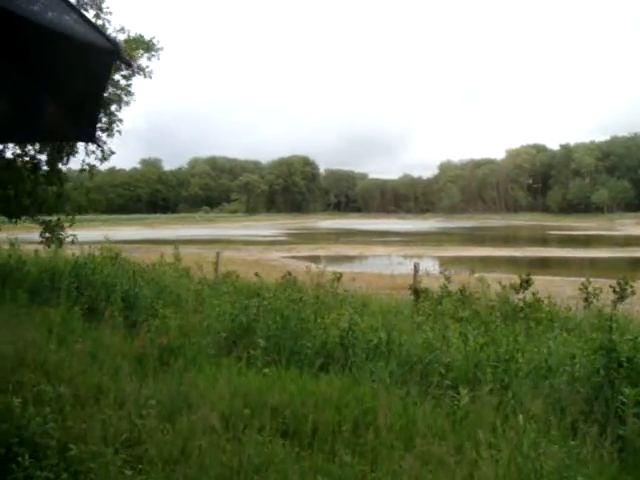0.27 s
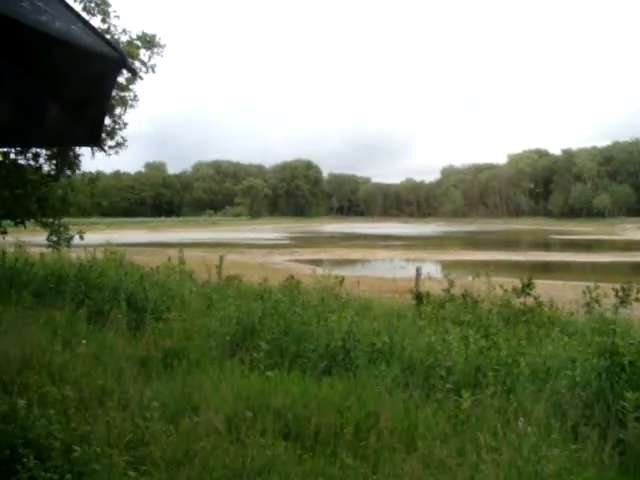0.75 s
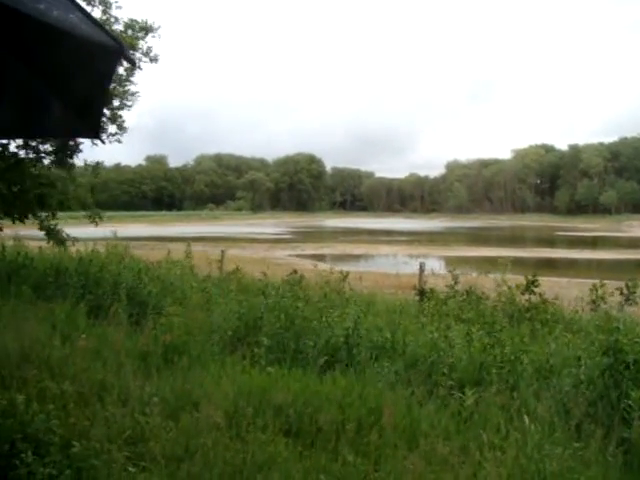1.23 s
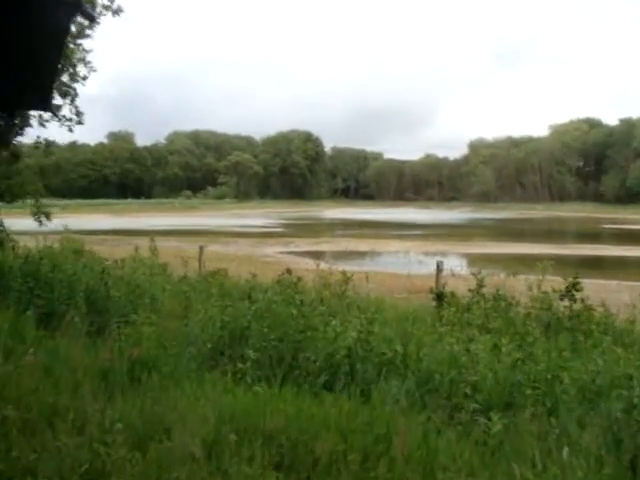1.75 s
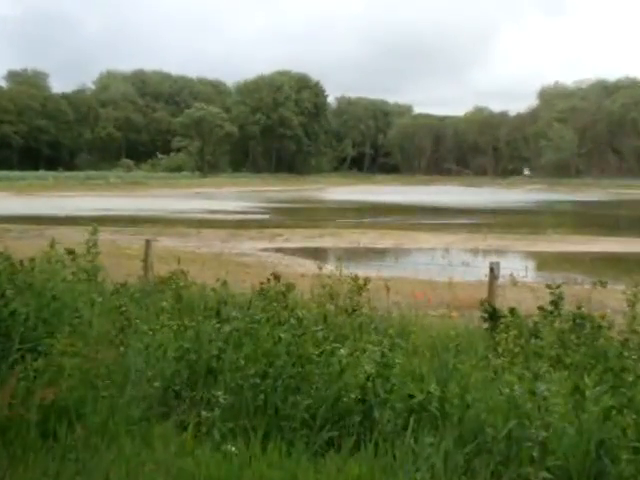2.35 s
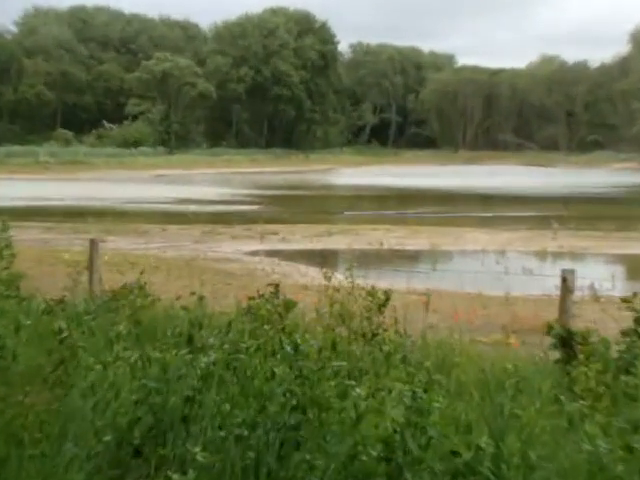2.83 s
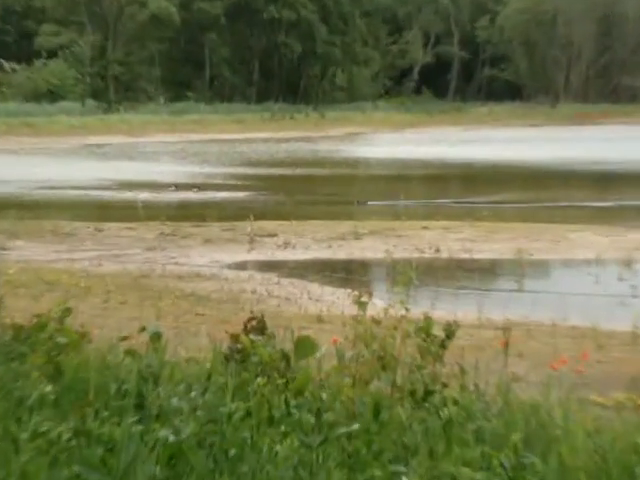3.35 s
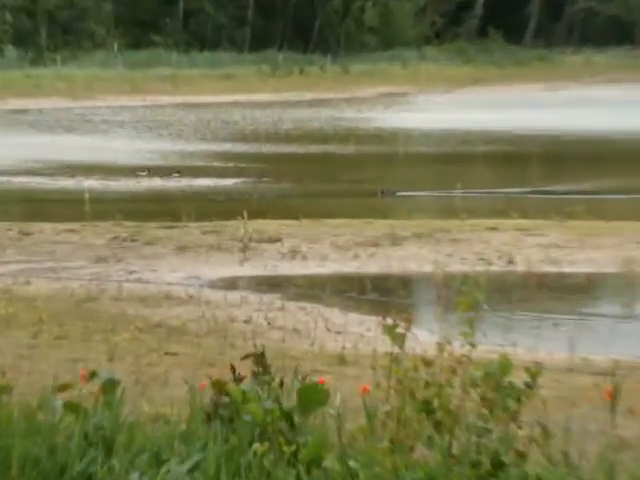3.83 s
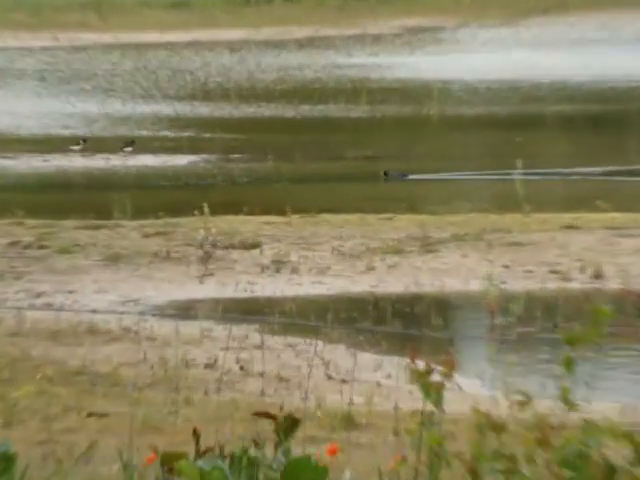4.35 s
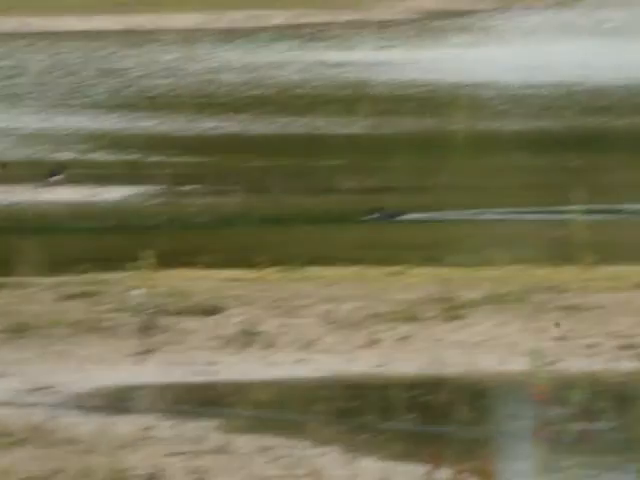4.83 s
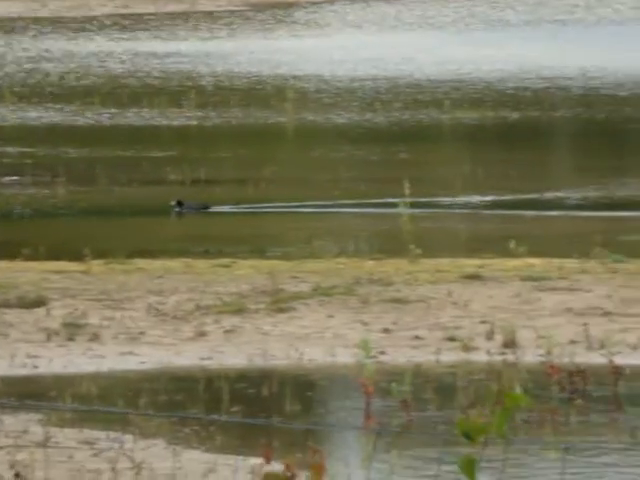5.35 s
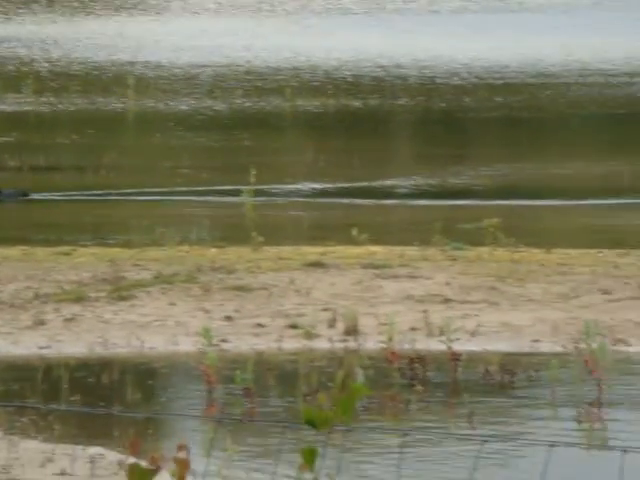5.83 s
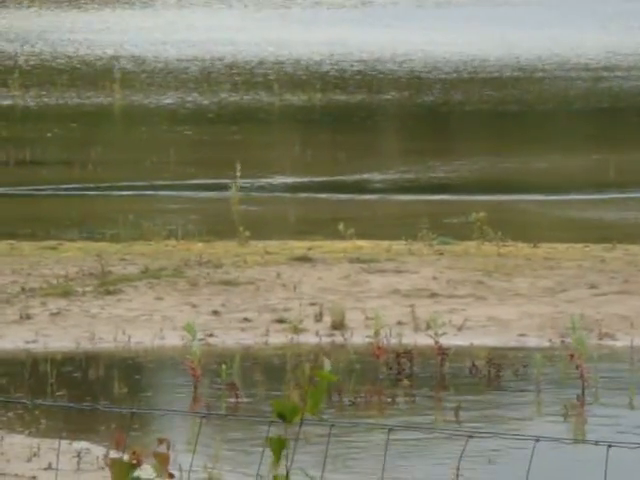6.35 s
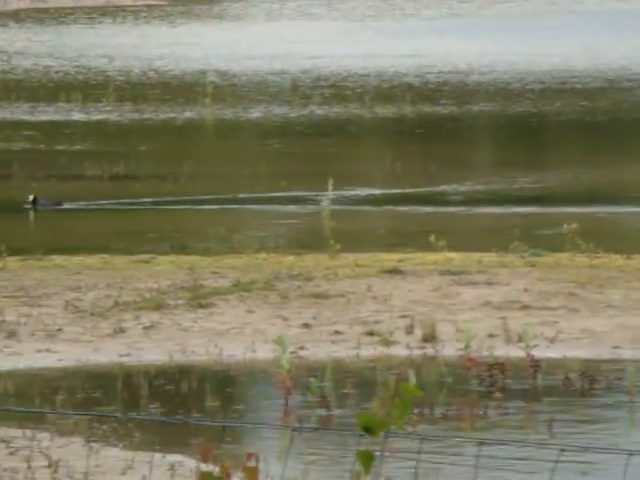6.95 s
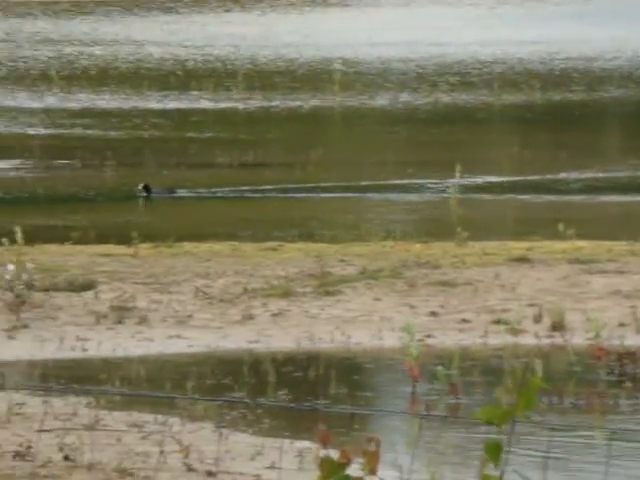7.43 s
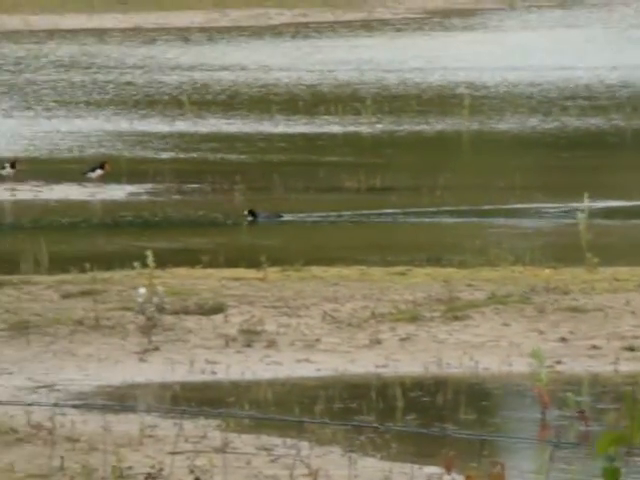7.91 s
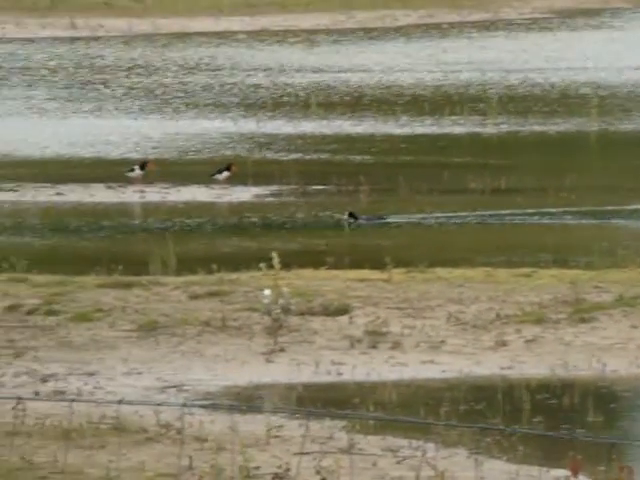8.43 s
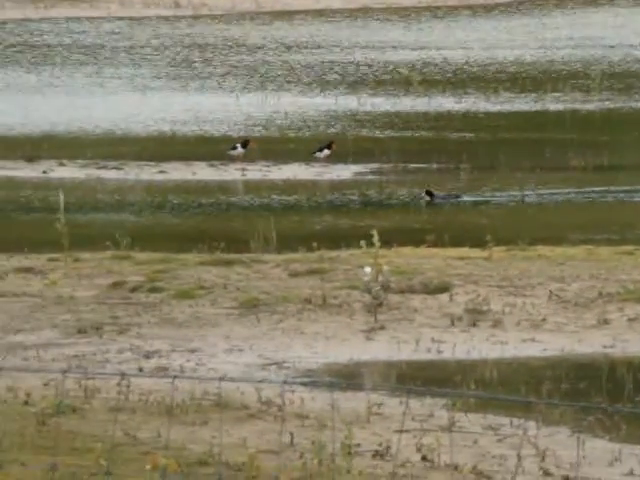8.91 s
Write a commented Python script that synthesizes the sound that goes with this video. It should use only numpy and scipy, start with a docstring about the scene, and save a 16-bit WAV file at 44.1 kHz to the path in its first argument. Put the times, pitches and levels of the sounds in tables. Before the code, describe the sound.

Several oystercatchers pipe across a marsh pool for the whole nine seconds, their short, shrill, rising and falling notes overlapping, with a light echo from reeds and trees. The piping is dense and loudest around 2 seconds. Longer, clean high whistles stand out at about 0.5, 2 and 2.6 seconds, and a softer one at 5.3. A quick fading trill runs underneath at 3 seconds. Until about 3.4 seconds, soft low thumps, a few dry ticks and faint handling rumble sound close to the microphone. From roughly 3.8 to 5.2 seconds the calls become quieter and longer, ending in falling tails, as a faint rustle swells. Distant water birds give faint hoarse yelps between 5 and 6.5 seconds. The short piping picks up again from about 5.4 seconds and continues, a little sparser, to the end. A quiet rush and hiss of air lies beneath everything.

```python
"""Short arched pips from several oystercatchers overlap across a marsh pool, with four long whistles.
Each note is a syrinx tone on a bending pitch; the reeds, the bank and the far tree line throw it back.
Midway the long pips end in falling tails, and hoarse yelps of other water birds carry from further off.
Air rushes and hisses over the marsh; soft thumps and ticks sound close to the hand-held microphone."""
import sys
import numpy as np
from scipy import signal
from scipy.fft import rfft, irfft, next_fast_len
from scipy.io import wavfile
from scipy.ndimage import map_coordinates

SR = 44100
rng = np.random.default_rng(int(sys.argv[2]) if len(sys.argv) > 2 else 0)


def int16_out(signal):
    """Quantize to a 16-bit WAV file."""
    q = np.round(np.clip(np.atleast_2d(signal).T, -1, 1) * 32767)
    wavfile.write(sys.argv[1], SR, q.astype(np.int16))


N = 404397


def amp(db):
    """Decibels to gain."""
    return 10 ** (np.asarray(db) / 20)


def unit(x):
    """Scaled to rms 1."""
    return x / np.sqrt(np.mean(x ** 2) + 1e-20)


def along(points, hz):
    """(frequency [Hz], value) points read on a log axis."""
    knots_hz, values = np.transpose(points)
    return np.interp(np.log(hz + 1), np.log(knots_hz + 1), values)


def level(rows):
    """Gain per sample from (time [s], level [dB]) rows."""
    return amp(np.interp(np.arange(N) / SR, *np.transpose(rows)))


def wobble(rate, size):
    """A smooth random curve, rate knots a second."""
    knots = rng.standard_normal(int(size * rate / SR) + 4)
    return map_coordinates(knots, [np.arange(size) * rate / SR])


def filtered(x, response):
    """x through a filter whose gain is response(hz)."""
    size = next_fast_len(len(x) + 4096)
    return irfft(rfft(x, size) * response(np.fft.rfftfreq(size, 1 / SR)), size)[:len(x)]


def coloured(x, colour):
    """x shaped by (frequency [Hz], gain [dB]) points."""
    return filtered(x, lambda hz: amp(along(colour, hz)))


def noise(colour):
    """Noise of rms 1 with the given colour."""
    return unit(coloured(rng.standard_normal(N), colour))


def add(track, start, sound):
    """Mix a sound into the track, start seconds in."""
    part = track[max(round(start * SR), 0):][:len(sound)]
    part += sound[:len(part)]


# Rush from the distant trees: (frequency [Hz], gain [dB])
RUSH_COLOUR = [(15, -61), (25, -29.5), (256, -7.5), (285, -4), (323, -5), (366, -2.5), (438, -4), (710, -2),
               (1020, -6.5), (1150, -2.5), (1280, -5.5), (1800, -7.5), (2340, -27), (3960, -120)]
# Hiss over the open marsh: (time [s], relative level [dB])
HISS_LEVELS = [(0.0, -41), (0.36, -46.5), (0.92, -45), (1.5, -44.5), (2.02, -40.5), (2.4, -42.5),
               (3.6, -44), (4.78, -42.5), (5.13, -43.5), (7.15, -51), (9.17, -52.5)]
# Its spectrum: (frequency [Hz], gain [dB])
HISS_COLOUR = [(900, -9), (1700, -2), (2500, 12), (4000, 4.5), (6000, 3), (8500, 0.5), (10000, -5.5)]
# A faint mid-range rustle that swells once: (time [s], level [dB])
RUSTLE_LEVELS = [(0, -69), (2.1, -52), (3.7, -53), (4.15, -48), (4.75, -46), (4.95, -58.5), (9.17, -85)]
# Handling rumble at the microphone: (time [s], level [dB])
RUMBLE_LEVELS = [(0, -80), (.3, -61), (1.2, -64.5), (2, -58), (2.35, -53), (2.7, -60), (3.1, -57),
                 (3.35, -78.5), (9.17, -80.5)]


def air():
    """The bed of the marsh: a low rush from far trees, fine hiss, a passing rustle and handling rumble."""
    rustle_colour = [(250, -32), (480, -3), (780, 1), (1000, -7.5), (1450, -5), (2500, -31)]
    rumble_colour = [(20, -19), (50, -5), (130, -5), (300, -10.5), (700, -40)]
    rush = amp(-48.5 + 0.28 * wobble(8.7, N)) * noise(RUSH_COLOUR)
    hiss = amp(4.5) * level(HISS_LEVELS) * noise(HISS_COLOUR)
    rustle = level(RUSTLE_LEVELS) * amp(3.6 * wobble(35, N)) * noise(rustle_colour)
    rumble = level(RUMBLE_LEVELS) * amp(3.9 * wobble(22, N)) * noise(rumble_colour)
    return rush + hiss + rustle + rumble


def puff(length, response):
    """A burst of coloured noise that swells fast and dies more slowly."""
    u = np.arange(int(3 * length * SR)) / (length * SR / 4)  # 1 at the peak
    return unit(filtered(rng.standard_normal(len(u)), response)) * u * np.exp(1 - u)


# Soft thumps at the microphone: (time [s], length [s], level [dB])
NEAR_THUMPS = [(0.311, 0.069, -45), (0.367, 0.021, -42), (0.583, 0.071, -46), (0.806, 0.091, -38),
               (0.822, 0.017, -30.5), (0.98, 0.045, -44.5), (1.463, 0.092, -45), (1.578, 0.035, -44),
               (1.644, 0.015, -33), (1.797, 0.0089, -32), (1.835, 0.044, -48), (2.199, 0.017, -37.5),
               (2.445, 0.01, -37), (2.596, 0.032, -49), (2.841, 0.043, -43), (3.074, 0.18, -59)]
# Dry ticks, just as close: (time [s], length [s], level [dB])
NEAR_TICKS = [(.752, .02, -34), (.99, .015, -42), (2.968, .014, -31), (3.372, .03, -37)]
# Spectrum of a tick: (frequency [Hz], gain [dB])
TICK_SPECTRUM = [(300, -16), (800, -5), (1150, 3), (1700, -1), (3000, -6), (6000, -14.5), (10000, -17)]


def knocks(low_hz=140, typical_edge_hz=310, typical_s=0.049):
    """Dull thumps and dry ticks close to the microphone, each a puff of noise."""
    out = np.zeros(N)
    for start, length, db in NEAR_THUMPS:
        edge_hz = typical_edge_hz * (typical_s / length) ** 0.42  # shorter thumps reach higher
        thump = puff(length, lambda hz: hz ** 2 / (hz ** 2 + low_hz ** 2) / (1 + (hz / edge_hz) ** 4))
        add(out, start, amp(db) * thump)
    for start, length, db in NEAR_TICKS:
        add(out, start, amp(db) * puff(length, lambda hz: amp(along(TICK_SPECTRUM, hz))))
    return out


def scatter(x, decay, delay_s, build_s):
    """Diffuse echo from foliage: it arrives late, builds up and dies at each frequency's own speed."""
    hz, t, spectrum = signal.stft(rng.standard_normal(SR), SR, nperseg=256)
    envelope = amp(-60 * t / along(decay, hz)[:, None]) * (1 - np.exp(-t / build_s))
    tail = signal.istft(spectrum * envelope, SR, nperseg=256)[1]
    tail = np.pad(tail / np.linalg.norm(tail), (int(delay_s * SR), 0))
    return signal.fftconvolve(x, tail)[:N]


# What the foliage round the pool sends back: (frequency [Hz], gain [dB])
FOLIAGE_COLOUR = [(2000, 0), (2700, 0), (5300, 2.5), (7500, 1), (10000, -6.5)]
# Echo from the far tree line: (frequency [Hz], time to fall 60 dB [s])
TREE_DECAY = [(500, 0.31), (2600, 1), (5000, 0.7), (8000, 0.42), (11000, 0.78)]


def echoes(calls):
    """The reeds answer at once, the bank later, and the tree line rings longest."""
    returned = coloured(calls, FOLIAGE_COLOUR)
    reeds = scatter(returned, [(2000, 0.12), (9000, 0.037)], delay_s=0.003, build_s=0.00092)
    bank = scatter(returned, [(2000, 0.092), (9000, 0.17)], delay_s=0.04, build_s=0.0021)
    trees = scatter(returned, TREE_DECAY, delay_s=0.03, build_s=0.0068)
    return amp(-13) * reeds + amp(-9) * bank + amp(-11) * trees


# Water birds further off: (time [s], length [s], pitch [Hz], relative level [dB])
FAR_YELPS = [(5.091, 0.044, 1230, -51), (5.249, 0.083, 1270, -53), (5.68, 0.053, 1260, -50.5),
             (5.735, 0.04, 1250, -49.5), (5.809, .1, 1250, -53), (6.47, 0.04, 1230, -50.5),
             (6.535, 0.034, 1216, -51)]


def far_yelps(width_hz=170):
    """Hoarse yelps, blurred by distance to a breathy band of noise."""
    out = np.zeros(N)
    for start, length, pitch_hz, db in FAR_YELPS:
        arch = np.sin(np.linspace(0, np.pi, int(length * SR)))
        breath = rng.standard_normal(len(arch))
        rasp = filtered(breath, lambda hz: 1 / (1 + ((hz - pitch_hz) / width_hz) ** 2))
        add(out, start, amp(db) * arch * unit(rasp))
    return out


def voice(pitch_hz, levels_db, jitter, flutter_db, smear=0):
    """A syrinx tone on one unsteady pitch; higher harmonics flutter and smear more over the water."""
    size = len(pitch_hz)
    phase = 2 * np.pi * np.cumsum(pitch_hz * (1 + jitter * wobble(915, size))) / SR
    tone = np.zeros(size)
    for k, db in enumerate(levels_db, 1):
        gain = amp(db + flutter_db * np.sqrt(k) * wobble(223.5, size))
        tone += gain * np.sin(k * phase + smear * np.log(k) * wobble(478, size))
    return np.sqrt(2) * tone


# Falling tails of the long pips midway, faint across the pool: (time [s], length [s], level [dB])
PIP_TAILS = [(3.92, 0.062, -46.5), (4.132, 0.073, -51), (4.31, 0.1, -52), (4.535, 0.097, -50),
             (4.776, 0.075, -45), (5.012, 0.082, -49.5)]


def pip_tails(from_hz=2450, to_hz=1576):
    """Falling tails of the long pips: two harmonics sliding down ever faster as each pip ends."""
    out = np.zeros(N)
    for start, length, db in PIP_TAILS:
        u = np.linspace(0, 1, int(length * SR))
        gate = np.clip(6 * np.minimum(u, 1 - u), 0, 1)
        pitch_hz = from_hz + (to_hz - from_hz) * u ** 1.2
        add(out, start, gate * voice(pitch_hz, [db, db + 1], jitter=0.008, flutter_db=1.5))
    return out


# Whistles across the pool: (start [s], end [s], pitch [Hz], steady fall [Hz], relative level [dB],
# swell from start to end [dB], overtones against the fundamental [dB])
LONG_WHISTLES = [(0.531, 0.695, 3305, 63, -24.5, 7, -4.5), (2.006, 2.18, 3467, 175, -21, -4.5, -12.5),
                 (2.55, 2.683, 3285, 32, -22, -0.5, -9.5), (5.308, 5.456, 3210, 21, -29, 1, -13.5)]


def whistles(scoop_s=0.0067, edge_s=0.0028, ends_db=-3, dull_ends_db=-11, third_db=-10):
    """Long, clean notes: each scoops up to pitch, swells or fades, is brightest midway, then droops."""
    out = np.zeros(N)
    for start, end, top_hz, fall_hz, db, swell_db, overtones_db in LONG_WHISTLES:
        length = end - start
        t = np.arange(int(length * SR)) / SR
        u = t / length
        scoop = 0.04 * np.exp(-t / scoop_s)
        droop = 0.076 * u ** 9.3
        pitch_hz = top_hz * (1 - scoop - droop) - fall_hz * u
        ends = (2 * u - 1) ** 2  # 0 midway, 1 at either end
        first_db = db + swell_db * (u - 0.5) + ends_db * ends + 1.5 * wobble(39, len(t))
        second_db = first_db + overtones_db + dull_ends_db * ends
        upper_db = [second_db + step_db + 4.5 * wobble(63.3, len(t)) for step_db in (0, third_db)]
        gate = np.clip(np.minimum(t, length - t) / edge_s, 0, 1)
        add(out, start, gate * voice(pitch_hz, [first_db, *upper_db], jitter=0.0082, flutter_db=1.45))
    return out


def trill(start=3.047, spacing_s=0.0485, note_s=0.025, top_hz=2310, first_db=-31.5, fade_db=3.5):
    """Pip rows for another bird under the piping: a quick, even run that fades away."""
    overtones_db = -4
    return [(start + k * spacing_s, note_s, top_hz, first_db - k * fade_db, overtones_db)
            for k in range(7)]


def pip(length, top_hz, db, overtones_db, catch=0.3, release=0.38, bite_db=1.2, bite_s=0.011):
    """One arch of pitch: the voice catches with a bite near the top and lets go more softly."""
    u = np.linspace(-1, 1, int(length * SR))
    # 2 is a parabola; longer and lower pips are flatter on top
    squareness = 2.4 * (length / 0.055) ** 0.45 * (2550 / top_hz) ** 1.247
    slack = np.abs(u) ** squareness  # 0 at full tension, 1 at either end
    held = np.clip((length - 0.085) / 0.04, 0, 1)  # long notes sweep less, with fainter flanks
    sweep = 0.37 * slack + 0.1733 * slack ** 5  # a steep flick opens and closes the note
    pitch_hz = top_hz * (1 - (1 - 0.55 * held) * sweep)

    weakness = 1 - 1 / (1 + np.where(u < 0, (slack / catch) ** 8, (slack / release) ** 3))
    full_db = db + np.array([0, overtones_db, overtones_db - 2, overtones_db - 4])  # harmonics 1 to 4
    flanks_db = np.array([-10.96, -9.66, -11.6, -10]) - 7 * held
    levels_db = full_db[:, None] + flanks_db[:, None] * weakness
    since_catch = (u + catch ** (1 / squareness)) * length / 2
    levels_db[1:] += bite_db * (since_catch > 0) * np.exp(-np.abs(since_catch) / bite_s)

    blur = np.clip((-23 - full_db.max()) / 12, 0, 1)  # scattering roughens faint pips most
    smear = 0.72 * (blur + 0.5 * held + 0.5) * (1 - 0.5 * weakness)
    tone = voice(pitch_hz, levels_db, jitter=0.004 + 0.01 * blur, flutter_db=1.74 + blur, smear=smear)
    gate = np.clip((1 - np.abs(u)) * 20, 0, 1)
    return tone * gate


# Oystercatchers across the pool: (time [s], length [s], top pitch [Hz], relative level [dB],
# overtones against the fundamental [dB])
ARCHED_PIPS = [(0.055, 0.045, 2517, -30, -8), (0.076, 0.048, 2455, -27.5, -7.5),
               (0.13, 0.037, 2950, -27, -3.5), (0.158, 0.05, 3000, -26.5, -2),
               (0.231, 0.027, 2494, -24, -12), (0.282, 0.025, 2397, -29, -17),
               (0.341, 0.049, 2610, -23.5, -11), (0.434, 0.065, 2907, -29.5, -5),
               (0.626, 0.057, 2354, -30.0, -7), (0.712, 0.09, 2937, -30, -2),
               (0.811, 0.061, 2893, -23.5, -7.5), (0.843, 0.055, 2630, -29.5, -4.5),
               (0.932, 0.046, 2594, -25.5, -7), (1.017, 0.074, 2950, -27.5, -9),
               (1.069, 0.096, 2969, -25.5, -8), (1.087, 0.14, 2690, -29, -3),
               (1.272, 0.135, 2718, -29.5, 2.5), (1.282, 0.131, 2905, -32, -2),
               (1.473, 0.122, 2716, -25.5, 0.5), (1.539, 0.045, 2530, -25, -4),
               (1.604, 0.052, 2858, -22.5, -8), (1.717, 0.18, 2618, -34.5, 3.5),
               (1.718, 0.11, 2675, -23.5, -9), (1.761, 0.043, 2497, -22.0, -12),
               (1.814, 0.045, 2883, -21.5, -8), (1.953, 0.053, 2550, -25.5, -11),
               (1.97, 0.078, 2648, -22, 1), (2.087, 0.037, 2576, -22, -6.5),
               (2.127, 0.038, 2487, -22.5, -5), (2.173, 0.05, 2740, -19.5, -7),
               (2.218, 0.068, 2607, -25, -6), (2.325, 0.04, 2468, -22.5, -11.5),
               (2.392, 0.064, 2805, -27, -7.5), (2.435, 0.047, 2474, -31.5, -2),
               (2.516, 0.038, 2524, -28, 1.5), (2.558, 0.041, 2505, -42.5, 12),
               (2.599, 0.048, 2590, -28, 0), (2.637, 0.06, 2823, -26, -5.5),
               (2.725, 0.043, 2500, -28.5, 3.5), (2.787, 0.066, 2630, -23.0, -6),
               (2.877, 0.059, 2808, -23.5, -6.5), (2.902, 0.036, 2490, -32, -3),
               (2.949, 0.037, 2326, -29, -7), (3, 0.028, 2337, -27, -11.5), (3.037, 0.048, 2646, -23, -7),
               (3.09, 0.052, 2645, -24.5, -6.5), (3.231, 0.05, 2652, -24.5, -10),
               (3.284, 0.055, 2610, -28.5, -12.5), (3.387, 0.023, 2300, -33, -5),
               (3.423, 0.059, 2688, -28, -9.5), (3.461, 0.055, 2445, -33.0, -8),
               (3.498, 0.062, 2640, -32.5, -8.5), (3.599, 0.046, 2467, -33, -4),
               (3.627, 0.095, 2620, -28.5, -10.5), (3.706, 0.055, 3050, -31.5, -4),
               (3.83, 0.159, 2575, -38.5, -3.5), (3.985, 0.062, 3114, -33.5, -4.5),
               (4.059, 0.102, 2540, -34.5, -10.5), (4.141, 0.08, 2500, -36.5, -10.5),
               (4.241, 0.052, 3060, -37.5, -2), (4.295, 0.081, 2413, -42, -9.5),
               (4.454, 0.043, 2480, -36.5, -12.5), (4.479, 0.15, 2410, -42, -6.5),
               (4.556, 0.066, 3056, -37, -2), (4.732, 0.093, 2434, -39.5, -6),
               (4.838, 0.038, 2975, -37, -4), (4.989, 0.088, 2490, -37, -9.5),
               (5.115, 0.106, 2900, -36, -12), (5.214, 0.057, 2250, -39.5, -9),
               (5.309, 0.052, 2395, -34, -16), (5.414, 0.042, 2920, -28.5, -20),
               (5.434, 0.036, 2496, -27.5, -17), (5.493, 0.042, 2080, -40, -5),
               (5.624, 0.046, 2400, -27.5, -13.5), (5.728, 0.059, 2936, -31, -17),
               (5.816, 0.06, 2250, -38, -7), (5.938, 0.05, 2400, -34, -14),
               (6.003, 0.055, 2305, -36.5, -7.5), (6.035, 0.072, 2620, -35.5, -9),
               (6.196, 0.063, 2455, -28.5, -13), (6.22, 0.043, 2410, -28.5, -11),
               (6.27, 0.047, 2576, -30.5, -8), (6.307, 0.051, 2608, -28.5, -5.5),
               (6.421, 0.036, 2440, -28.0, -12.5), (6.49, 0.058, 2600, -28, -7),
               (6.57, 0.067, 2740, -34.5, -7.5), (6.648, 0.099, 2466, -43.5, 1),
               (6.719, 0.045, 2405, -34, -14), (6.732, 0.08, 2683, -34.5, -4),
               (6.789, 0.079, 2597, -34.5, -7), (6.92, 0.068, 2402, -32.5, -7.5),
               (7.001, 0.061, 2620, -28.0, -4.5), (7.165, 0.041, 2506, -28, -3),
               (7.188, 0.048, 2470, -30, -4), (7.214, 0.09, 2554, -29, -2.5), (7.22, 0.084, 2655, -34.5, 0),
               (7.367, 0.075, 2587, -27, -3), (7.423, 0.048, 2386, -39.5, -1),
               (7.499, 0.054, 2585, -30, -2.5), (7.531, 0.052, 2637, -29, -3.5),
               (7.688, 0.076, 2350, -39.5, -2), (7.771, 0.089, 2690, -31.5, -4),
               (7.805, 0.051, 2610, -28.5, -9.5), (7.999, 0.045, 2350, -35.5, -3),
               (8.025, 0.042, 2675, -26.5, -7), (8.094, 0.049, 2770, -29, -4.5),
               (8.241, 0.049, 2660, -29, -8), (8.371, 0.042, 2190, -32.5, -10),
               (8.441, 0.049, 2702, -28.5, -5), (8.509, 0.047, 2815, -31.5, -8.5),
               (8.711, 0.041, 2245, -36.0, -1.5), (8.796, 0.075, 2540, -30.5, -2.5),
               (8.81, 0.059, 2816, -27.5, -7), (9.041, 0.051, 2756, -28, -10.5)]
# Resonance of the throat and open bill: (frequency [Hz], gain [dB])
BILL_COLOUR = [(1500, -7.5), (2600, -0.5), (3100, 3.5), (3800, -7), (5000, 0), (6100, -10.5), (7300, 4.5),
               (8000, -5), (8800, -9.5), (9800, -14)]


def piping():
    """The overlapping pips of several birds and one trill, coloured by throat and bill."""
    out = np.zeros(N)
    for start, *note in [*ARCHED_PIPS, *trill()]:
        add(out, start, pip(*note))
    return coloured(out, BILL_COLOUR)


def scene():
    """One microphone by the pool: the birds and their echoes, over close knocks and the marsh air."""
    calls = amp(-0.46) * piping() + pip_tails() + amp(7) * far_yelps()
    whistling = amp(-0.56) * whistles()
    answers = echoes(calls + amp(-3.5) * whistling)  # the whistles sound drier than the pips
    return (calls + whistling + answers + knocks() + air())[None]


def record(dry):
    """The microphone's band ends steeply in the high treble."""
    top_hz = 10100
    return np.array([filtered(x, lambda hz: 1 / np.sqrt(1 + (hz / top_hz) ** 190)) for x in dry])


dry = scene()
out = record(dry)
int16_out(out)
```